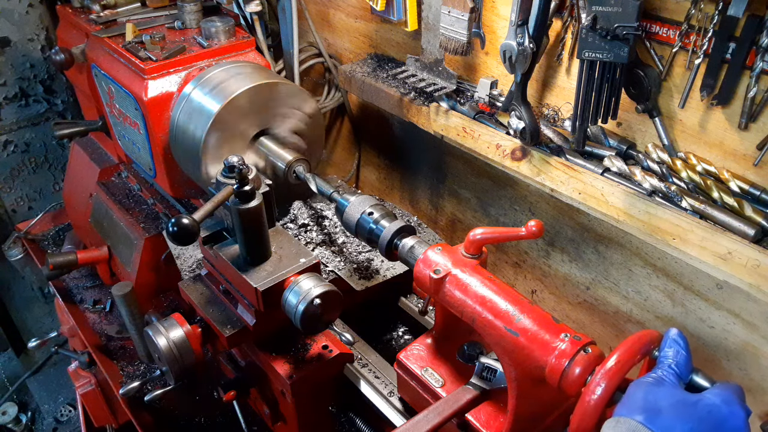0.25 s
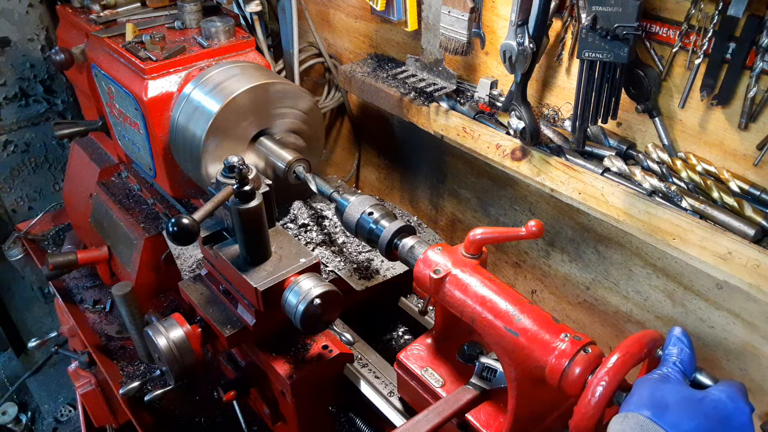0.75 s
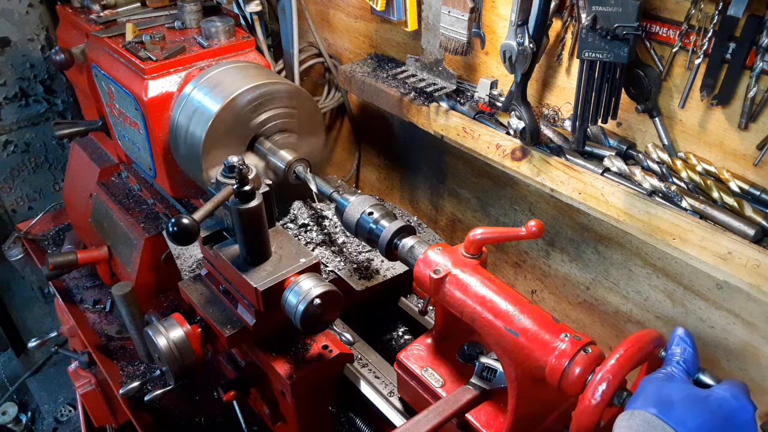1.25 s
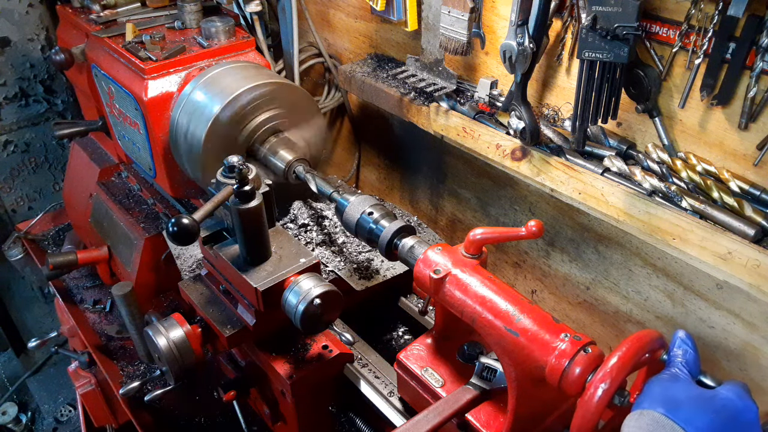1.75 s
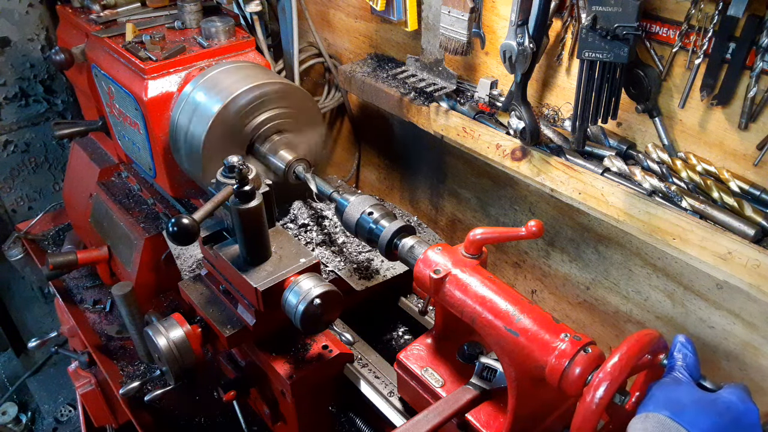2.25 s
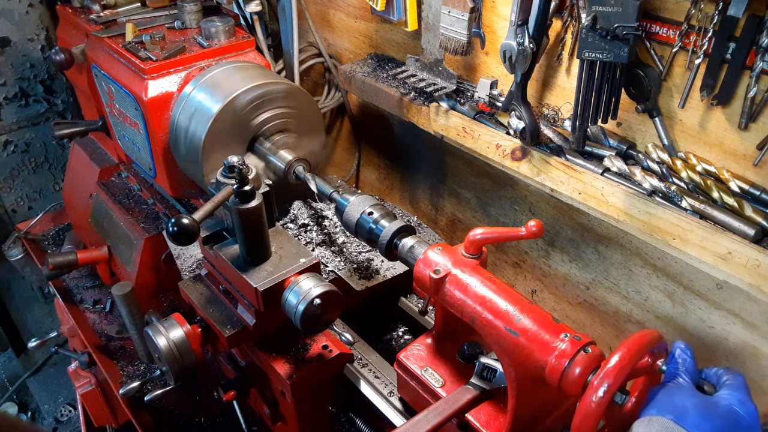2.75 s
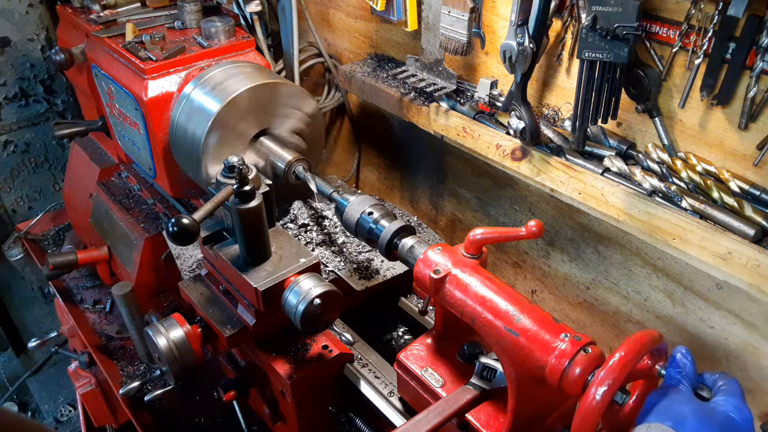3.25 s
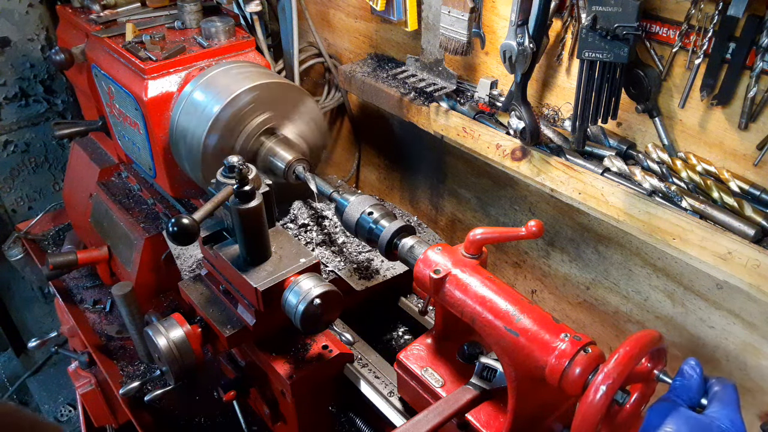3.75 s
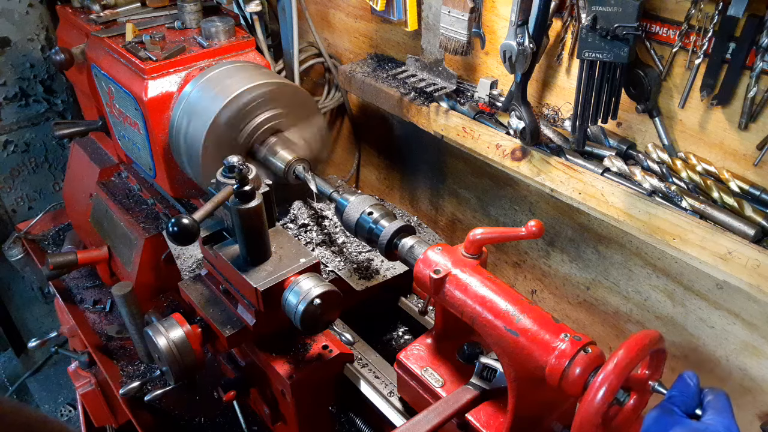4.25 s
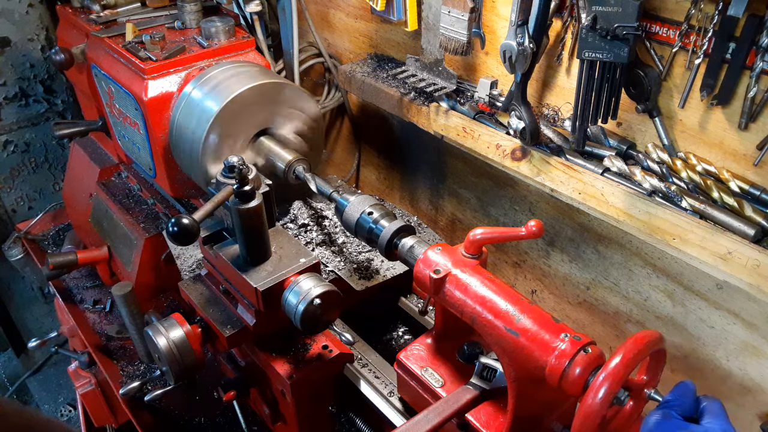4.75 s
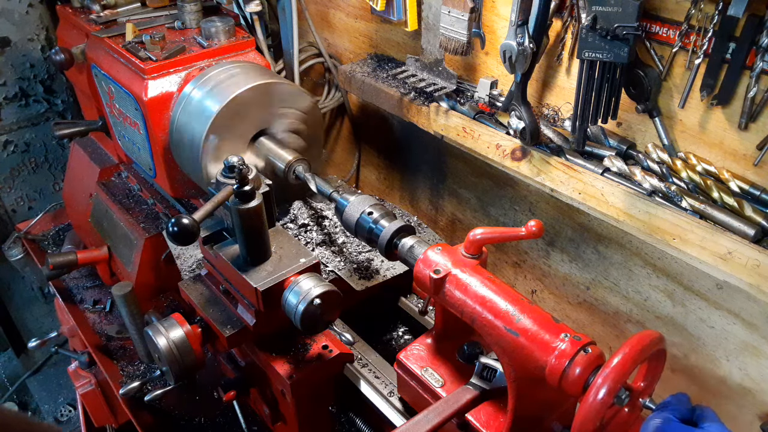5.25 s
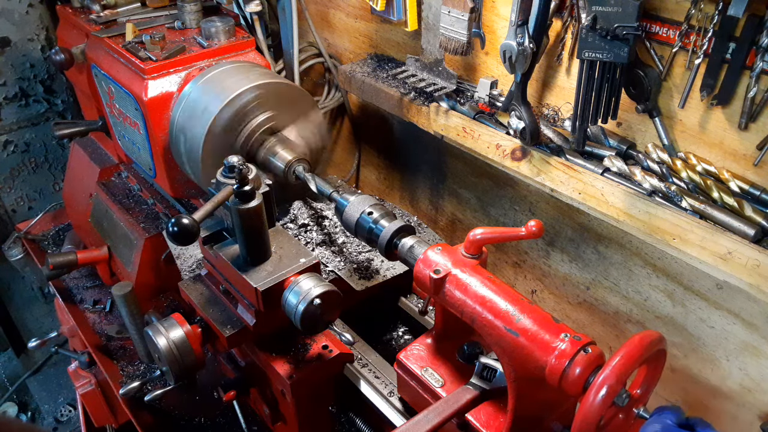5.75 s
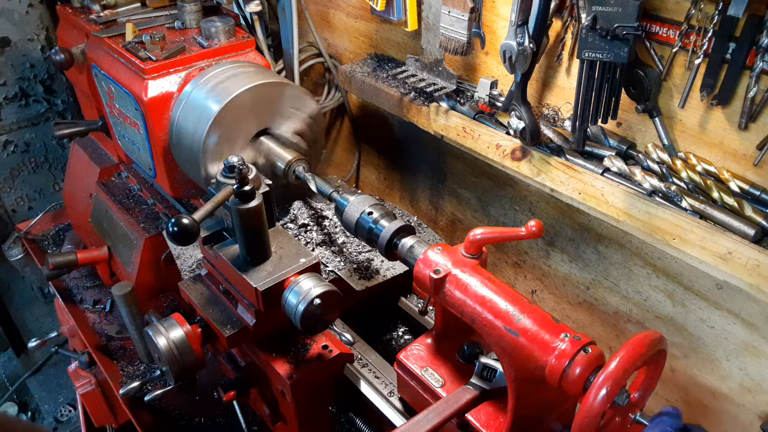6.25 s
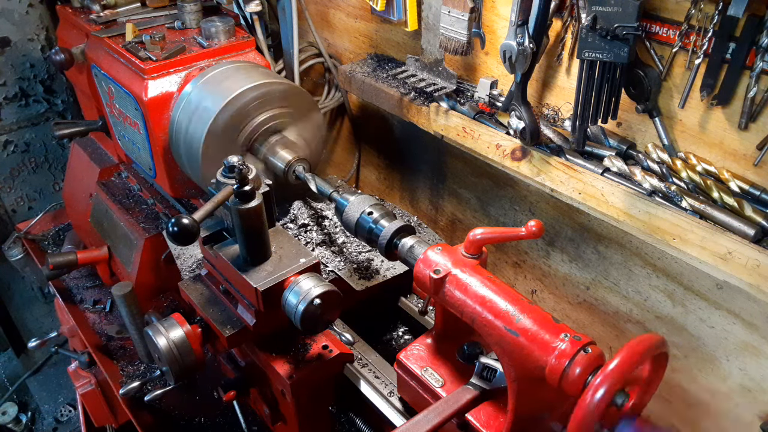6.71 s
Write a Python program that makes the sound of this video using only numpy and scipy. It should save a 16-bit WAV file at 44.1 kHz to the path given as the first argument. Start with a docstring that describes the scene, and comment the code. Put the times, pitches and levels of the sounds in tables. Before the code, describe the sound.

A blunt drill bit chatters in a spinning steel bar, giving a high, ringing squeal that pulses very fast and falters briefly now and then. A thin rubbing hiss rides on it, and the lathe hums and rumbles behind. Near the end the squeal breaks into short chirps and dies, leaving a brief rasp and a louder motor hum. It is all heard close up, in stereo, in a small workshop.

```python
"""A dull drill chatters in a turning steel bar: about 28 times a second it grabs, slips and squeals
a short note with overtones, which rings on in the steel and the workshop. Its blunt edges hiss as
they rub, and behind it the bench lathe hums and roars, all close to a two-port (stereo) microphone.
At the end the feed stops, the squeal dies and the background comes up in level."""
import sys
import numpy as np
from scipy import signal
from scipy.fft import rfft, irfft, next_fast_len
from scipy.io import wavfile
from scipy.ndimage import map_coordinates

SR = 44100
rng = np.random.default_rng(int(sys.argv[2]) if len(sys.argv) > 2 else 0)


def unload_wav(signal):
    """Save mono or channel-first audio to the path in sys.argv[1] as 16-bit WAV at rate SR, clipped to [-1, 1]."""
    wavfile.write(
        sys.argv[1],
        SR,
        np.round(np.clip(np.atleast_2d(signal).T, -1, 1) * 32767).astype(np.int16),
    )


N = 307818
TIME = np.arange(N) / SR
SIDES = np.array([[.5], [-.5]])  # splits a difference between left and right


def amp(db):
    """Turn decibels into a gain."""
    return 10 ** (np.asarray(db) / 20)


def unit(x):
    """Scale a signal to an average (rms) size of 1."""
    return x / np.sqrt(np.mean(x ** 2) + 1e-20)


def along(points, hz):
    """Read between the rows of a frequency table, on a log scale."""
    f, values = np.transpose(points)
    return np.interp(np.log(hz + 1), np.log(f + 1), values)


def curves(rows):
    """Join the rows of a time table with straight lines, one curve per value column."""
    times, *columns = np.transpose(rows)
    return [np.interp(TIME, times, column) for column in columns]


def wobble(rate):
    """A smooth curve through `rate` random values a second."""
    return map_coordinates(rng.standard_normal(int(N * rate / SR) + 4), [TIME * rate])


def filtered(x, response):
    """Shape a sound: multiply each frequency by response(hz)."""
    size = next_fast_len(N + SR // 2)
    return irfft(rfft(x, size) * response(np.fft.rfftfreq(size, 1 / SR)), size)[..., :N]


# How alike left and right sound (1 = the same): f/Hz, likeness
LIKENESS = [(60, 1), (150, 1), (300, 0.86), (640, 0.49), (1400, 0.1), (4000, 0.01)]
# How much louder the left port is than the right: f/Hz, level/dB
BALANCE = [(60, 2), (200, -1.2), (380, 2.5), (700, 1), (2400, -0.5), (4400, -0.5), (8100, -3.5), (15000, 4)]
def stereo_noise(gain):
    """Noise shaped by gain(hz), alike on both sides in the bass and unrelated in the treble."""
    def spread(hz):
        angle = np.arccos(np.clip(along(LIKENESS, hz), -1, 1)) / 2
        return gain(hz) * [np.cos(angle), np.sin(angle)]
    mid, side = filtered(rng.standard_normal((2, N)), spread)
    return filtered(np.array([mid + side, mid - side]), lambda hz: amp(along(BALANCE, hz) * SIDES))


# The low roar from bass to treble, with a band near 4 kHz cut away: f/Hz, level/dB
ROAR_SPECTRUM = [(20, -40), (45, -23), (60, -9), (150, 6), (450, 0), (700, -5.5), (1100, -4), (1400, -11),
                 (2600, -8.5), (3400, -11), (3700, -88), (5000, -19.5), (16000, -63)]
# Where the cabinet and bench ring along: f/Hz, width/Hz, boost/dB
CABINET_RINGS = [(70.6, 21, 14.5), (131.1, 17, 15.5), (205.5, 32, 10), (255.5, 37, 11.5), (288, 30, 10.5),
                 (339.7, 50.5, 18), (392.7, 25, 12.5), (427, 14, 8)]
def roar():
    """Low noise that booms in the cabinet and pulses with the motor's magnetic pull."""
    def boost(f):
        return sum(amp(db) ** 2 / (1 + (2 * (f - hz) / width) ** 2) ** 2
                   for hz, width, db in CABINET_RINGS)
    pull = 1 + 0.044 * np.sin(2 * np.pi * 120 * TIME)
    return pull * stereo_noise(lambda f: amp(along(ROAR_SPECTRUM, f)) * np.sqrt(1 + boost(f)))


# Pitches of the magnetic hum and the gears: f/Hz
HUM_PITCHES = [120, 240, 360, 480, 566, 744, 1170, 1369, 4951]
# Strength of each of those tones: level/dB, wander/dB
HUM_LEVELS = [(-1, 0.1), (-12, 2.5), (-6, 2), (-25, 1.5), (-29, 2), (-30, 2.5), (-30.5, 1.5), (-33.5, 4),
              (-41.5, 4)]
def hum():
    """Mains hum, its overtones and the gear tones, each wavering a little."""
    out = np.zeros((2, N))
    for hz, (db, wander_db) in zip(HUM_PITCHES, HUM_LEVELS):
        phase = 2 * np.pi * hz * TIME + 0.3 * wander_db * wobble(4.9) + rng.uniform(0, 2 * np.pi)
        lead = np.arccos(np.clip(along(LIKENESS, hz), 0, 1)) / 2
        gain = amp(db + wander_db * wobble(9) + along(BALANCE, hz) * SIDES)
        out += gain * np.sqrt(2) * np.sin(phase + lead * SIDES)
    return out


# How the background comes up in level: t/s, hum gain/dB, roar gain/dB
BACKGROUND_RISE = [(0, 0, 0.5), (6.42, 0, 0), (6.56, 6, 2), (6.66, -0.5, 2.5), (6.74, 5, 3.5),
                   (6.85, 3.5, 4.5), (6.98, 3, 1.5)]
def background(hum_db=-25, roar_db=-23):
    """The hum and roar together; they come up in level as the squeal ends."""
    hum_rise, roar_rise = curves(BACKGROUND_RISE)
    tones, noise = hum(), roar()
    return (amp(hum_db + hum_rise + wobble(7)) * tones
            + amp(roar_db + roar_rise + 0.8 * wobble(6.2)) * noise)


# How long the workshop takes to fade by 60 dB: f/Hz, fade time/s
ROOM_FADE = [(200, 0.32), (3000, 0.44), (9000, 0.076), (15000, 0.18)]
def workshop(x, size=SR // 2):
    """The room's ring: overlapping pieces of sound each get a fresh tail of fading noise."""
    starts = np.arange(0, N + size, size // 2)
    hz, t, noise = signal.stft(rng.standard_normal((len(starts), 2, size)), SR, nperseg=256)
    fade = amp(-60 * t / along(ROOM_FADE, hz)[:, None])
    tails = signal.istft(noise * fade, SR, nperseg=256)[1]
    padded = np.pad(x, (size // 2 + 200, 2 * size))  # the room answers 200 samples late
    out = np.zeros((2, N + 4 * size))
    for i, tail in zip(starts, tails):
        piece = np.sqrt(np.hanning(size)) * padded[i:i + size]
        answer = signal.fftconvolve(piece[None], tail / np.linalg.norm(tail[0]), axes=1)
        out[:, i:i + answer.shape[1]] += answer
    return out[:, size // 2:][:, :N]


# The wall's echo at the left port, then the right: delay/s, level/dB
WALL_BOUNCE = [(0.0066, -3), (.0072, -6.5)]
def wall_echo(x):
    """The wall behind the bench sends back a later, quieter copy."""
    return np.array([amp(db) * np.pad(x, (round(delay * SR), 0))[:N] for delay, db in WALL_BOUNCE])


def humps(times, db, peak, rise, fall):
    """One hump per grab: chatter builds, then breaks off near `peak` seconds after the grab's time."""
    kicks = np.zeros(N)
    kicks[(times * SR).astype(int)] = amp(db)
    t = np.arange(-SR // 20, SR // 20 + 1) / SR - peak
    hump = 1 / (np.exp(-t / rise) + np.exp(t / fall))
    return np.abs(signal.fftconvolve(kicks, hump / hump.max(), "same"))


# The hiss from low to high, cut away near 4 kHz and below: f/Hz, level/dB
HISS_SPECTRUM = [(3600, -87), (4300, -18.5), (5000, -13.5), (5500, -27), (6100, 1.5), (7100, -9.5),
                 (8200, 0.5), (9000, -1.5), (9700, -28.5), (10700, -19), (11800, -14), (13300, -23),
                 (14700, -19.5), (15800, -26)]
def rubbing(times, overtone_db, db=-39, leave_s=6.715, fade_db_per_s=72):
    """The blunt edges hiss on the steel, louder in each grab, and fade as they leave it."""
    pulses = unit(humps(times, overtone_db, peak=0.00061, rise=0.0047, fall=0.0026))
    bite_db = np.interp(TIME, times, np.maximum(overtone_db - np.median(overtone_db), -12))
    fade_db = fade_db_per_s * np.maximum(TIME - leave_s, 0)
    hiss = unit(stereo_noise(lambda hz: amp(along(HISS_SPECTRUM, hz))))
    return amp(db + 0.13 * bite_db - fade_db) * (1 + 0.4 * pulses) * hiss


# The dragging rasp from low to high: f/Hz, level/dB
RASP_SPECTRUM = [(300, -11), (600, -9), (850, -5), (1000, 6), (1300, -14.5), (1800, -1.5), (2400, -17.5),
                 (2880, -6), (3200, -18), (5200, -14.5), (6000, -37)]
# How loud that rasp is: t/s, level/dB
DRAG_LEVEL = [(0, -100), (6.3, -51.5), (6.5, -48), (6.7, -43), (6.8, -36.5), (6.86, -35), (6.92, -43),
              (6.98, -35)]
def dragging():
    """The drill rasps on the wall of the hole as it eases out."""
    rasp = unit(stereo_noise(lambda hz: amp(along(RASP_SPECTRUM, hz))))
    return amp(curves(DRAG_LEVEL)[0] + 2.3 * wobble(40)) * rasp


# One natural note of the steel bar: f/Hz, width/Hz, level/dB
BAR_NOTE = (2885, 5.4, 0.75)
def bar_ring(x):
    """The bar picks up sound near its own note and rings on."""
    hz, width, db = BAR_NOTE
    return filtered(x, lambda f: amp(db) * 1j * f * width / (hz * hz - f * f + 1j * f * width))


# The pace of the chatter, even between rows: t/s, grabs so far
GRAB_COUNT = [(0.0147, 0), (0.4013, 11), (0.6867, 19), (1.5464, 44), (1.8273, 52), (2.8065, 79),
              (3.0038, 84), (3.3365, 93), (3.5732, 100), (3.8937, 111), (4.0186, 115), (4.3124, 124),
              (4.5518, 131), (4.7779, 138), (5.1565, 149), (5.4967, 158), (6.0481, 172), (6.2916, 178),
              (6.4036, 181), (6.4454, 182), (6.5737, 186), (6.7849, 194)]
# How the drill bites: t/s, overtone level/dB, base note level/dB, f/Hz
DRILL_BITE = [(0, -22, -20.5, 2971), (0.7, -24, -21.5, 2991), (1.5, -21.5, -21, 2968),
              (2.8, -21, -21, 2975), (3.499, -23.5, -21.5, 2998), (3.85, -19.5, -22.5, 2959),
              (4.501, -22, -21.5, 2968), (5.15, -20, -22.5, 2972), (5.6, -23.5, -22.5, 2970),
              (6.101, -23, -21.5, 2957), (6.381, -24, -20.5, 2997), (6.519, -35, -17.5, 3038),
              (6.61, -39.5, -28.5, 3022), (6.67, -37, -19.5, 3022), (6.71, -42, -36.5, 3060),
              (6.76, -42.5, -26, 3070), (6.79, -41, -35.5, 3046)]
# Moments when it loses its grip and grabs weakly: t/s, length/s, overtone loss/dB
WEAK_SPELLS = [(0.205, 0.071, 6.5), (0.511, 0.057, 18.5), (0.759, 0.059, 5.5), (1.03, 0.026, 2.5),
               (1.234, 0.033, 1.5), (1.34, 0.026, 2), (1.475, 0.026, 0), (1.973, .03, 14.5),
               (2.088, 0.045, 4), (2.237, 0.026, 8.5), (2.495, 0.044, 17), (2.999, 0.063, 18.5),
               (3.267, 0.073, 8), (3.519, 0.048, 4), (3.722, 0.064, 9), (3.918, .03, 3),
               (4.163, 0.025, 6.5), (4.602, 0.047, 4.5), (4.977, 0.023, 2), (5.631, 0.065, 7.5),
               (5.792, 0.058, 5), (5.874, 0.063, 24.5), (6.01, 0.054, 3), (6.167, 0.12, 19.5)]
# Single grabs that bite hardest: t/s, base note gain/dB
HARD_GRABS = [(0.33, 2), (1.135, 3.5), (1.376, 3.5), (1.62, 4), (1.862, 3), (2.045, 0), (2.3, 2),
              (2.41, 3.5), (2.443, 2), (2.697, 4), (3.865, 2.5), (3.896, 3), (3.988, 3), (4.214, 4.5),
              (4.281, 2.5), (4.747, 3.5), (5.158, 3), (5.497, 3.5), (6.049, 2.5), (6.542, 1.5)]
def chatter():
    """The drill grabs unevenly: gives each grab's time and two levels, and a running pitch curve."""
    row_times, count = np.transpose(GRAB_COUNT)
    times = np.interp(np.arange(count[-1] + 1), count, row_times)
    bite_times, bite_overtone_db, bite_note_db, bite_hz = np.transpose(DRILL_BITE)
    loss_db = sum(db * np.exp(-(2 * (times - t) / length) ** 2) for t, length, db in WEAK_SPELLS)
    hard_db = sum(db * (np.abs(times - t) < .014) for t, db in HARD_GRABS)
    luck = rng.standard_normal((len(times), 2))
    overtone_db = np.interp(times, bite_times, bite_overtone_db) - 2.5 * np.abs(luck[:, 0])
    overtone_db += 0.61 * hard_db - loss_db
    note_db = np.interp(times, bite_times, bite_note_db) + 1.2 * luck[:, 1]
    note_db += hard_db - 0.47 * loss_db
    return times, overtone_db, note_db, np.interp(TIME, bite_times, bite_hz)


# The squeal's higher tones: multiple of the base note, level/dB, left minus right/dB,
# left lead/rad, sharpness (0 = swells with the base note, 1 = follows the grab's short spike)
SQUEAL_OVERTONES = [(2, -12, -8.5, 1.25, 0.31), (3, -2, -13.5, 1.68, 1), (4, -18, 0, 1.16, 0.42),
                    (5, -18, 2, 1.8, 0.67)]
def squeal(times, overtone_db, note_db, pitch_hz, ease_s=6.43):
    """The drill sticks and slips; each grab pulls the pitch down and sharpens the overtones."""
    light = times > ease_s  # as the feed eases, the grabs turn into short chirps
    note = humps(times[~light], note_db[~light] + 2.5, peak=0.0044, rise=0.014, fall=0.002)
    note += humps(times[light], note_db[light] + 5, peak=0.0016, rise=0.0034, fall=0.00083)
    spike = humps(times, overtone_db + 1.5, peak=0.0006, rise=0.0029, fall=0.001)
    pull = humps(times, (overtone_db + 24) / 4, peak=-0.00037, rise=0.0036, fall=0.003)
    hz = pitch_hz + 22 - 50 * pull + 15 * wobble(150) + 6 * wobble(20)
    phase = 2 * np.pi * np.cumsum(hz) / SR
    out = note * amp(2.64 * wobble(200) + 3.9 * SIDES) * np.sin(phase + 1.79 * SIDES)
    for multiple, db, pan_db, lead, sharpness in SQUEAL_OVERTONES:
        smear = 0.056 * multiple * wobble(1100)  # uneven slips blur the higher overtones
        swell = spike ** sharpness * note ** (1 - sharpness)
        gain = amp(db + 1.5 + 2.6 * wobble(300) + pan_db * SIDES)
        out += swell * gain * np.sin(multiple * phase + smear + lead * SIDES)
    return out + bar_ring(out)


def scene():
    """The drill up close, the wall and the room answering it, and the lathe all around."""
    times, overtone_db, note_db, pitch_hz = chatter()
    drill = squeal(times, overtone_db, note_db, pitch_hz)
    echoes = wall_echo(drill.mean(0)) + amp(-4.5) * workshop(drill[1])
    return drill + echoes + rubbing(times, overtone_db) + dragging() + background()


def record(dry, top_hz=15830):
    """The very highest treble is cut away."""
    return filtered(dry, lambda hz: hz < top_hz)


dry = scene()
out = record(dry)
unload_wav(out)
```